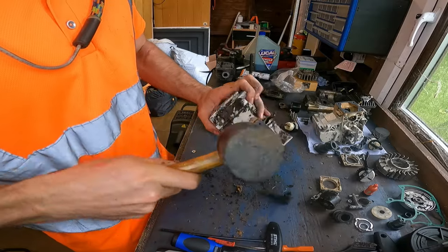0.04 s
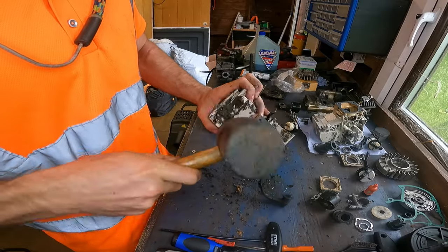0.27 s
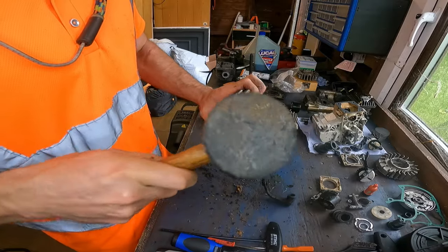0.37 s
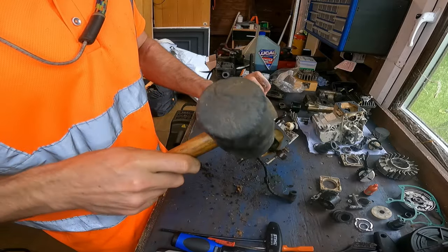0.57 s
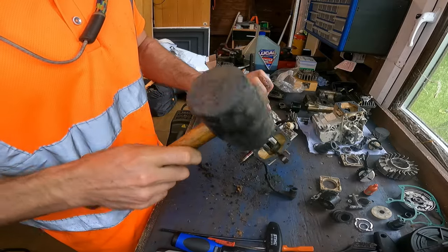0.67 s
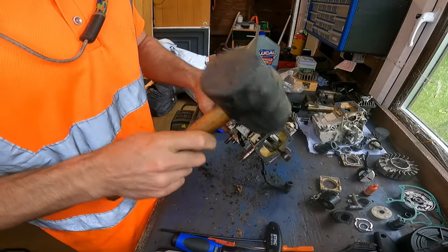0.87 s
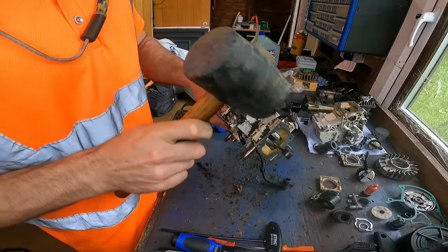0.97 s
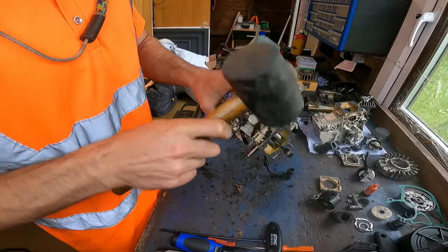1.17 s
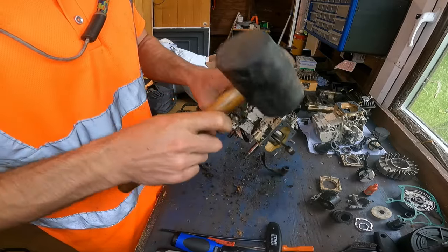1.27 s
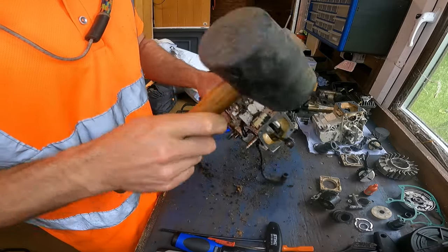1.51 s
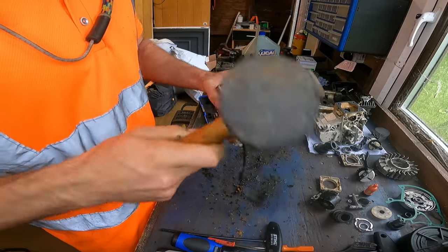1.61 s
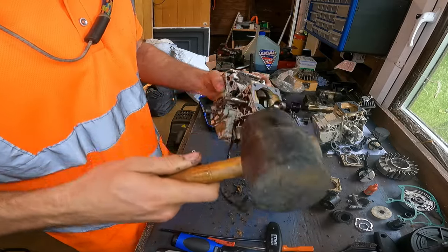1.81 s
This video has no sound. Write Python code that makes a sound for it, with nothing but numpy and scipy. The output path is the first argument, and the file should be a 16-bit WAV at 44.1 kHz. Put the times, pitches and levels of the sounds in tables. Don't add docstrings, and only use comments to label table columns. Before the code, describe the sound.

A rubber mallet knocks a hand-held metal casing four times, with small loose bits clacking down

```python
import sys
import numpy as np
from scipy import signal
from scipy.fft import rfft, irfft, next_fast_len
from scipy.io import wavfile
from scipy.ndimage import uniform_filter1d, map_coordinates

SR = 44100
rng = np.random.default_rng(int(sys.argv[2]) if len(sys.argv) > 2 else 0)


def store_pcm(level_fs):
    pcm = np.round(np.clip(level_fs, -1, 1) * 32767).astype(np.int16)
    wavfile.write(sys.argv[1], SR, np.atleast_2d(pcm).T)


def ratio_of_db(decibels):
    return 10 ** (np.asarray(decibels, float) / 20)


N = 81585


def unit(x):
    return x / np.sqrt(np.mean(x ** 2) + 1e-20)


def peak(x):
    return x / np.abs(x).max()


def along(points, hz):
    f, v = np.transpose(points)
    return np.interp(np.log(hz + 1), np.log(f + 1), v)


def curve(rows):
    s, value = np.transpose(rows)
    return np.interp(np.arange(N) / SR, s, value)


def wobble(rate_hz):
    knots = rng.standard_normal(int(N * rate_hz / SR) + 4)
    return map_coordinates(knots, [np.arange(N) * rate_hz / SR])


def onset(t, rise_s, power=1):
    return 1 - np.exp(-(t / rise_s) ** power)


def filtered(x, response):
    m = next_fast_len(x.shape[-1] + 8192)
    return irfft(rfft(x, m) * response(np.fft.rfftfreq(m, 1 / SR)), m)[..., :x.shape[-1]]


def low_cut(f, hz, order):
    return (1j * f / (hz + 1j * f)) ** order


def body(peaks, f, tilt_db):
    total = 0
    for k, (hz, width_hz, db) in enumerate(peaks):
        gain = (-1) ** k * ratio_of_db(db + tilt_db * np.log2(hz / 1000))
        total = total + gain * 1j * f * width_hz / (hz * hz - f * f + 1j * f * width_hz)
    return total


def hiss(t, spectrum, tilt_db):
    noise = rng.standard_normal(len(t))
    return unit(filtered(noise, lambda f: ratio_of_db(along(spectrum, f) + tilt_db * np.log2((f + 1) / 1000))))


# (frequency [Hz], t60 [s])
SHOP_T60 = [(150, 0.15), (1000, 0.45), (4000, 0.51), (9000, 0.32), (15000, 0.075)]


def add(mix, s, sound, pan_db, tail_db, tone):
    tail_hold_s, tail_cut_db_s, streak_db, tail_alike = 0.15, 151.5, 0.8, 0.7
    lag_s, bench_s, bench_db = 1.6e-5, 0.0018, -16.5
    hz, t, z = signal.stft(rng.standard_normal((2, SR // 2)), SR, nperseg=256)
    fade_db = -60 * t / along(SHOP_T60, hz)[:, None] - tail_cut_db_s * np.maximum(t - tail_hold_s, 0)
    streaks = uniform_filter1d(rng.standard_normal(fade_db.shape), size=2, axis=0)
    fade_db += streak_db * unit(uniform_filter1d(streaks, size=8, axis=1))
    colour = unit(ratio_of_db(along(tone, hz)))[:, None]
    a, b = signal.istft(z * ratio_of_db(fade_db) * colour, SR, nperseg=256)[1]
    turn = np.arccos(tail_alike) / 2
    mid, diff = np.cos(turn) * a, np.sin(turn) * b
    out = ratio_of_db(tail_db) * np.array([mid + diff, mid - diff])
    out *= onset(np.arange(out.shape[1]) / SR, 0.001)

    side = np.array([[1], [-1]])

    def ports(f):
        bounce = 1 + side * ratio_of_db(bench_db) * np.exp(-2j * np.pi * f * bench_s)
        return np.exp(-1j * np.pi * f * lag_s * side) * bounce

    out[:, :len(sound)] += filtered(np.array([sound, sound]), ports)
    spot = mix[:, round(s * SR):][:, :out.shape[1]]
    spot += ratio_of_db([[pan_db / 2], [-pan_db / 2]]) * out[:, :spot.shape[1]]


# (frequency [Hz], correlation [-])
ALIKENESS = [(60, 0.98), (240, 0.82), (950, 0.17), (3770, 0.71), (15000, 0.48)]


def rush(spectrum, patchy_db):
    z = signal.stft(rng.standard_normal((2, N + 512)), nperseg=512)[2]
    patches = uniform_filter1d(rng.standard_normal(z.shape[1:]), size=6, axis=0)
    patches = unit(uniform_filter1d(patches, size=8, axis=1))
    pair = signal.istft(z * ratio_of_db(patchy_db * patches), nperseg=512)[1][:, :N]

    def mid_side(f):
        turn = np.arccos(np.clip(along(ALIKENESS, f), -1, 1)) / 2
        return ratio_of_db(along(spectrum, f)) * np.array([np.cos(turn), np.sin(turn)])

    mid, side = filtered(pair, mid_side)
    return unit(np.array([mid + side, mid - side]))


def push(t, length_s):
    return np.sin(np.pi * np.clip(t / length_s, 0, 1)) ** 2


def casing_ring(t, modes):
    late_s = 0.00042
    ring = filtered(push(t, 0.000084), lambda f: body(modes, f, 0) * np.exp(-2j * np.pi * f * late_s))
    return ratio_of_db(-5) * peak(ring * onset(t, 0.0011, 2))


def rubber_slap(t):
    slap_hz, width_hz, contact_s = 1100, 1150, 0.00064
    return peak(filtered(push(t, contact_s), lambda f: body([(slap_hz, width_hz, 0)], f, 0) ** 2))


# (frequency [Hz], density [dB per Hz])
CRACK_SPECTRUM = [(880, -35), (1500, -5), (5540, -7), (6960, -20.5), (9470, -20.5), (14500, -44.5),
                  (16000, -72.5)]


def crack(t, tilt_db):
    level_db, t60_s = -9, 0.024
    return hiss(t, CRACK_SPECTRUM, tilt_db) * ratio_of_db(level_db - 60 * t / t60_s) * onset(t, 0.0027, 2)


def rubber_thump(t):
    level_db, thump_hz, sag_hz, sag_s, t60_s = -6, 217, 500, 0.0014, 0.014
    cycles = thump_hz * t + sag_hz * sag_s * onset(t, sag_s)
    return -ratio_of_db(level_db) * np.sin(2 * np.pi * cycles) * ratio_of_db(-60 * t / t60_s) * onset(t, 0.0013, 2)


def casing_hum(t, db):
    hum_hz, t60_s, lasts_s, damp_t60_s = 368.3, 0.36, 0.14, 0.16
    fade_db = -60 * t / t60_s - 60 * np.maximum(t - lasts_s, 0) / damp_t60_s
    return np.sin(2 * np.pi * hum_hz * t) * onset(t, 0.0043) * ratio_of_db(db + fade_db)


# (time [s], peak [dB], brightness [dB per octave], hum [dB], slap [dB])
BLOW_EVENTS = [
    (0.1088, -9, 1.5, -20.5, 0),
    (0.355, -10, -0.5, -20.5, 3.5),
    (1.184, -13.5, 0, -29.5, -1.5),
    (1.4220, -10, 1, -26, -3.5),
]
# (frequency [Hz], width [Hz], level [dB])
SPOT_MODES = [
    [(582, 100, -12), (1007, 37, -12), (1217, 35, -1), (1820, 270, -11), (2080, 190, -11.5),
     (2830, 110, -11.5), (3457, 140, -5), (4310, 71, -11.5), (5170, 200, -20.5), (4980, 120, -19),
     (7950, 200, -28.5)],
    [(600, 150, -16), (1017, 35, -6), (1204, 35, -0.5), (1426, 39, -9), (2390, 74, -5.5), (2976, 150, -6.5),
     (3630, 120, -3), (4430, 140, -19.5), (5330, 320, -13), (7320, 340, -26), (9500, 200, -31)],
    [(741, 40, -12), (1008, 35, -8), (1105, 9.1, -7.5), (1520, 140, -16), (1945, 160, -11.5),
     (2700, 86, -16.5), (3596, 590, -4), (5125, 140, -7), (5837, 240, -12), (6820, 180, -13.5),
     (7700, 400, -19)],
    [(830, 28, -25.5), (926, 60, -3.5), (1220, 35, 3.5), (1966, 110, -1), (3212, 154, 3.5), (4100, 250, -4),
     (4520, 140, -4.5), (5640, 68, -4.5), (6550, 280, -26), (7700, 100, -14), (9700, 390, -39.5)],
]
# (frequency [Hz], density [dB per Hz])
BLOW_TAIL_SPECTRUM = [(260, -28), (450, -0.5), (586, -16), (1100, -2), (1710, -15.5), (3610, -16.5),
                      (6000, -25), (9500, -39), (11500, -52), (15000, -69)]


def mallet():
    pan_db, wet_db, low_cut_hz = -2.4, -19.5, 29
    tail_tilt = 1.57
    mix = np.zeros((2, N))
    t, long = np.arange(SR // 15) / SR, np.arange(SR // 3) / SR
    for (s, db, tilt_db, hum_db, slap_db), modes in zip(BLOW_EVENTS, SPOT_MODES):
        blow = ratio_of_db(slap_db) * rubber_slap(t) + casing_ring(t, modes)
        blow = blow + crack(t, tilt_db) + rubber_thump(t)
        blow = filtered(blow, lambda f: low_cut(f, low_cut_hz, 2))
        tone = [(hz, g + tilt_db * tail_tilt * np.log2(hz / 1000)) for hz, g in BLOW_TAIL_SPECTRUM]
        add(mix, s, ratio_of_db(db + 6.5) * blow, pan_db, db + wet_db, tone)
        mix[:, round(s * SR):][:, :len(long)] += casing_hum(long, hum_db)
    return mix


# (time [s], peak [dB], brightness [dB per octave], left-right [dB], lowest mode [dB])
CLACK_EVENTS = [
    (1.2690, -21, -3, 0, 3),
    (1.3408, -28.5, -5, -1, 8),
    (1.3654, -36.5, -5, 1, 13),
    (1.5489, -18, 0.5, 0, 7),
    (1.5901, -22.5, -1.5, -1.5, -4.5),
    (1.608, -34.5, -6.5, 1.5, 2),
]
# (frequency [Hz], width [Hz], level [dB])
BIT_MODES = [(1885, 830, 0.5), (3710, 466, 2), (4670, 500, -18), (5980, 640, 3), (7390, 580, 0),
             (9840, 600, -3.5), (13500, 1500, -19)]
# (frequency [Hz], density [dB per Hz])
SNAP_SPECTRUM = [(700, -40), (1200, -3.5), (3500, -4), (6000, -4), (9100, -8), (14000, -33), (16000, -40.5)]
# (frequency [Hz], density [dB per Hz])
CLACK_TAIL_SPECTRUM = [(470, -36), (800, -24), (1200, -5), (4850, -15), (5760, -8.5), (12500, -29),
                       (15000, -64)]


def clacks():
    snap_db, snap_t60_s, shiver_db, shiver_t60_s, wet_db = -9, 0.013, -17, 0.077, -25
    mix, t = np.zeros((2, N)), np.arange(SR // 20) / SR
    contact = 1.0 * (t == 0)
    for s, db, tilt_db, pan_db, low_db in CLACK_EVENTS:
        modes = [(hz, width, g + low_db * (k == 0)) for k, (hz, width, g) in enumerate(BIT_MODES)]
        ring = filtered(contact, lambda f: body(modes, f, tilt_db) / (1 + 1j * f / 12000) ** 2)
        ring = peak(ring * onset(t, 0.0019, 2))
        fade = ratio_of_db(snap_db - 60 * t / snap_t60_s) + ratio_of_db(shiver_db - 60 * t / shiver_t60_s)
        snap = hiss(t, SNAP_SPECTRUM, tilt_db) * fade * onset(t, 0.00059)
        add(mix, s, ratio_of_db(db + 7.5) * (ring + snap), pan_db, db + wet_db, CLACK_TAIL_SPECTRUM)
    return mix


# (time [s], peak [dB], brightness [dB per octave], left-right [dB])
TICK_EVENTS = [
    (0.152, -24, 0.5, 1.5),
    (.421, -40, 1, -6),
    (.452, -48, 2, 7.5),
    (0.7636, -27.5, 0, 3.5),
    (1.5873, -30.5, -7.5, -9),
    (1.719, -55, 0, 0.5),
]
# (frequency [Hz], width [Hz], level [dB])
GRAIN_MODES = [(1900, 900, -15), (4300, 900, -5.5), (6000, 4500, 2), (9430, 2000, -11)]
# (frequency [Hz], density [dB per Hz])
GRIT_SPECTRUM = [(900, -51.5), (1400, -15.5), (4300, -12.5), (6000, -2.5), (10200, -17.5), (16000, -54)]


def grit():
    hiss_db, t60_s, wet_db, cut_hz = -13, 0.0097, -37.5, 1000
    mix, t = np.zeros((2, N)), np.arange(SR // 20) / SR
    contact = 1.0 * (t == 0)
    for s, db, tilt_db, pan_db in TICK_EVENTS:
        chip = peak(filtered(contact, lambda f: (body(GRAIN_MODES, f, tilt_db) / (1 + 1j * f / 11000) ** 3
                                                 * low_cut(f, cut_hz, 3))))
        fizz = hiss(t, GRIT_SPECTRUM, tilt_db) * ratio_of_db(hiss_db - 60 * t / t60_s)
        add(mix, s, ratio_of_db(db) * (chip + fizz), pan_db, db + wet_db, GRIT_SPECTRUM)
    return mix


# (time [s], level [dB], t60 [s])
THUD_EVENTS = [
    (0.137, -34, 0.16),
    (.247, -30.5, 0.096),
    (0.268, -41.5, 0.24),
    (0.385, -44.5, .08),
    (0.499, -40, 0.17),
    (1.359, -51.5, 0.16),
    (1.479, -34, 0.18),
    (1.587, -49, 0.11),
]
# (frequency [Hz], density [dB per Hz])
THUD_SPECTRUM = [(35, -38.5), (70, -2), (200, -2), (330, 0.5), (460, -2.5), (582, -16.5), (700, -9),
                 (910, -49.5), (1540, -120)]


def thuds():
    out, t = np.zeros(N), np.arange(SR // 5) / SR
    for s, db, t60_s in THUD_EVENTS:
        bump = hiss(t, THUD_SPECTRUM, 0) * ratio_of_db(db - 60 * t / t60_s) * onset(t, 0.0013)
        spot = out[round(s * SR):][:len(t)]
        spot += bump[:len(spot)]
    return out


# (time [s], length [s], level [dB])
STROKES = [
    (0.62, 0.061, -71),
    (0.664, 0.18, -72.5),
    (0.818, 0.2, -71.5),
    (0.958, 0.11, -71),
    (1.051, 0.14, -59.5),
    (1.15, 0.48, -62.5),
    (1.42, .22, -70),
    (1.735, 0.07, -68.5),
]
# (frequency [Hz], density [dB per Hz])
CLOTH_SPECTRUM = [(800, -20), (1500, -4), (4000, -1), (8000, -4), (12500, -8), (14300, -24), (16000, -50)]


def sleeves():
    t, strokes = np.arange(N) / SR, 0
    for s, length_s, db in STROKES:
        strokes = strokes + ratio_of_db(db) * np.sin(np.pi * np.clip((t - s) / length_s, 0, 1) ** 0.53) ** 1.2
    return strokes * ratio_of_db(1.5 * wobble(60)) * rush(CLOTH_SPECTRUM, patchy_db=-0.5)


def bird():
    start_s, start_hz, fall_hz_s, level_db, rise_s = 1.785, 7400, 3530, -67, 0.019
    t = np.maximum(np.arange(N) / SR - start_s, 0)
    hz = start_hz - fall_hz_s * t + 90 * wobble(400)
    level = ratio_of_db(level_db + 3.6 * wobble(330)) * np.clip(t / rise_s, 0, 1)
    return level * np.sin(2 * np.pi * np.cumsum(hz) / SR)


# (time [s], level [dB])
RUMBLE_LEVEL = [(0.0, -64), (0.148, -54.5), (0.298, -53.5), (0.4, -47), (0.546, -62), (0.824, -66.5),
                (1.06, -65), (1.396, -52), (1.524, -55), (1.756, -65.5), (1.85, -61.5)]
# (frequency [Hz], density [dB per Hz])
RUMBLE_SPECTRUM = [(15, -47), (30, -11.5), (50, -1), (82, -14), (174, -11), (246, -21.5), (285, -16.5),
                   (600, -34), (780, -76), (1320, -120)]


def rumble():
    return ratio_of_db(curve(RUMBLE_LEVEL) + 4.0 + 1.2 * wobble(22)) * rush(RUMBLE_SPECTRUM, patchy_db=3.5)


# (time [s], gain [dB])
REDUCER_GAIN = [(0, 0), (.08, 7.5), (.5, 14), (.6, 4), (.7, -1), (1.0, 0), (1.75, 5), (1.85, 3.5)]
# (frequency [Hz], density [dB per Hz])
AIR_SPECTRUM = [(240, -33), (400, -5), (852, -11), (935, -8.5), (1580, -5), (1730, -4), (5520, -13),
                (12700, -35.5), (16000, -48.5)]


def shop_air():
    level_db = -72 + 1.0
    return ratio_of_db(level_db + curve(REDUCER_GAIN) + 0.92 * wobble(30)) * rush(AIR_SPECTRUM, patchy_db=3.5)


def scene():
    return mallet() + clacks() + grit() + thuds() + sleeves() + bird() + rumble() + shop_air()


def band_limit(x):
    return signal.sosfilt(signal.butter(12, 16300, fs=SR, output="sos"), x)


# (lead [s], level [dB])
PRE_ECHOES = [(.0103, -21.5), (.021, -36)]


def record(dry):
    pre_hz, pre_width_hz, pre_wide_db = 880, 350, -18
    smear_db, smear_hz, smear_width_hz = -9, 1050, 45
    top = 0.96

    def reducer(f):
        band = np.exp(-((f - pre_hz) / pre_width_hz) ** 2) + ratio_of_db(pre_wide_db) / (1 + (f / 5000) ** 6)
        early = sum(ratio_of_db(db) * np.exp(2j * np.pi * f * lead_s) for lead_s, db in PRE_ECHOES)
        smear = ratio_of_db(smear_db) / (1 - 1j * (f - smear_hz) / smear_width_hz)
        return 1 + band * early + smear

    x = filtered(dry, reducer)
    x = x / (1 + np.abs(x / top) ** 6) ** (1 / 6)
    mix = filtered(x, lambda f: 1 / (1 + (f / 15700) ** 24))
    return band_limit(mix)


dry = scene()
out = record(dry)
store_pcm(out)
```